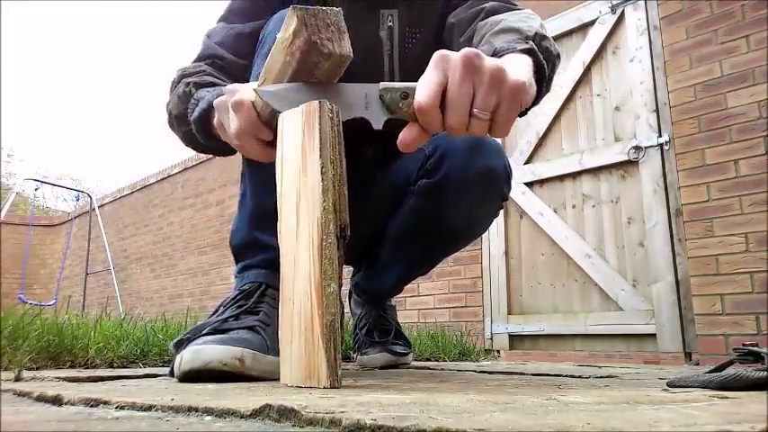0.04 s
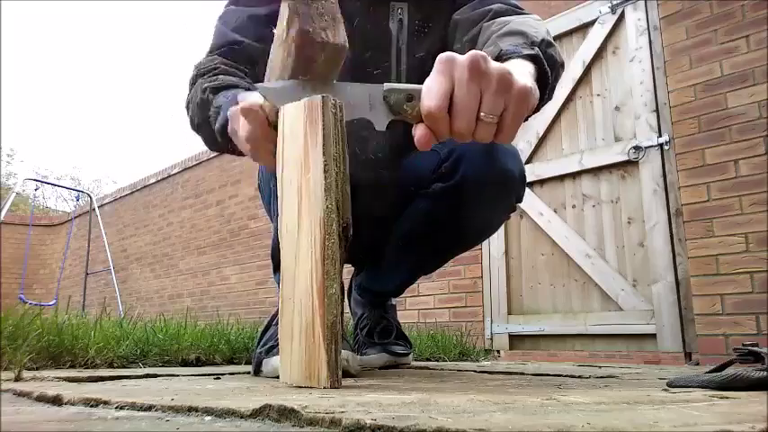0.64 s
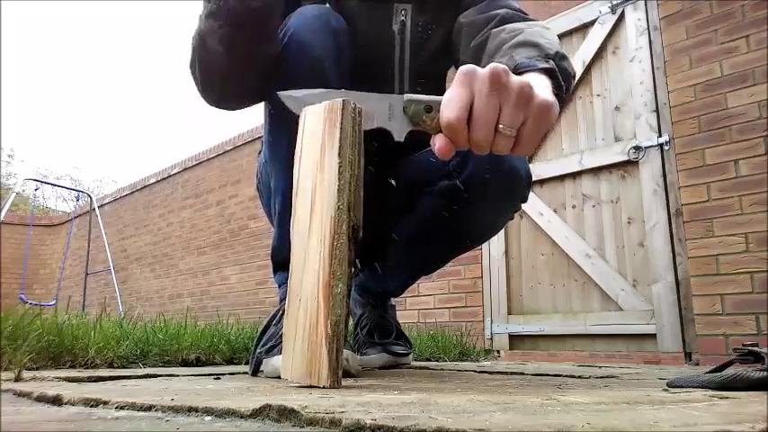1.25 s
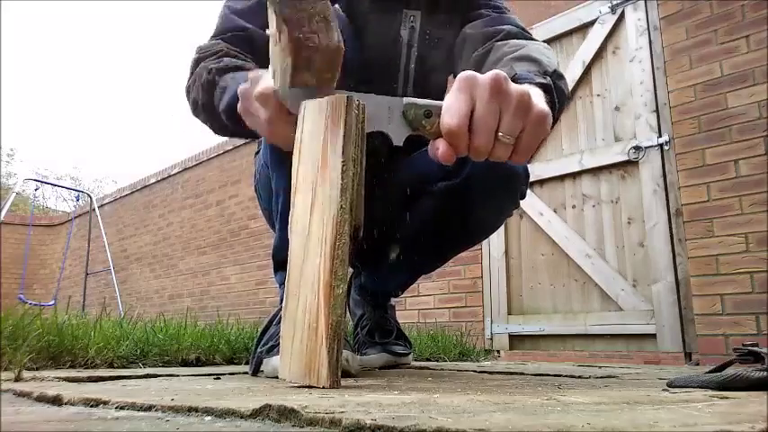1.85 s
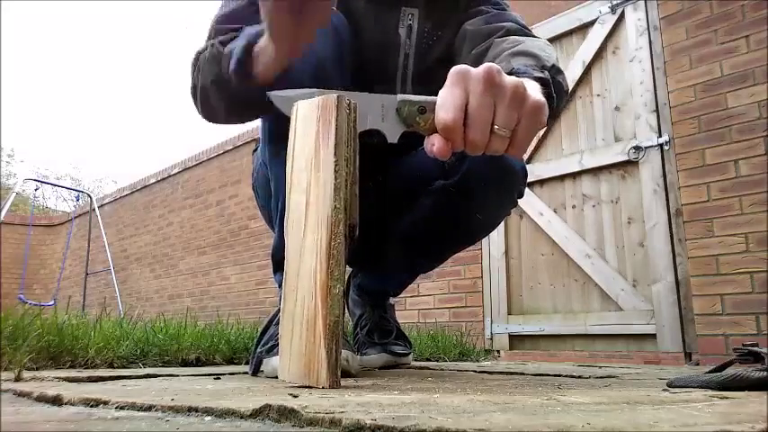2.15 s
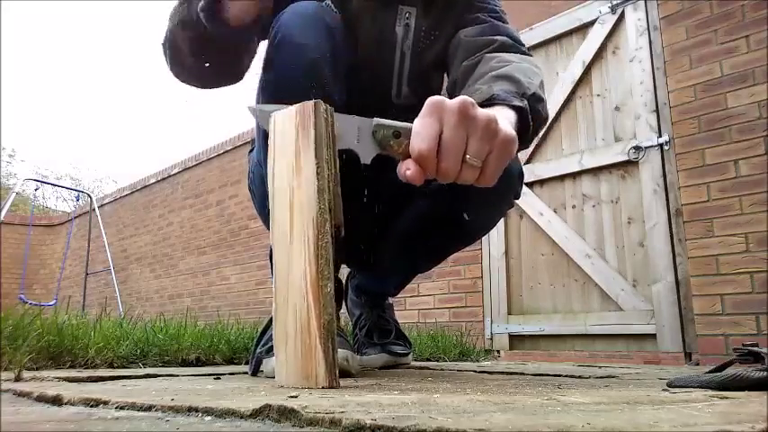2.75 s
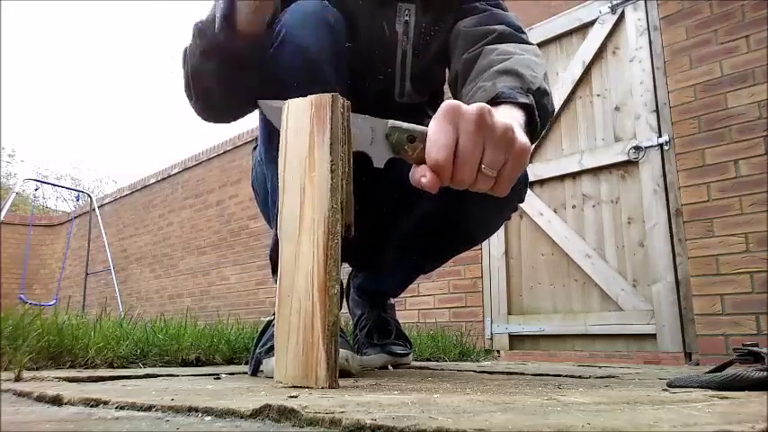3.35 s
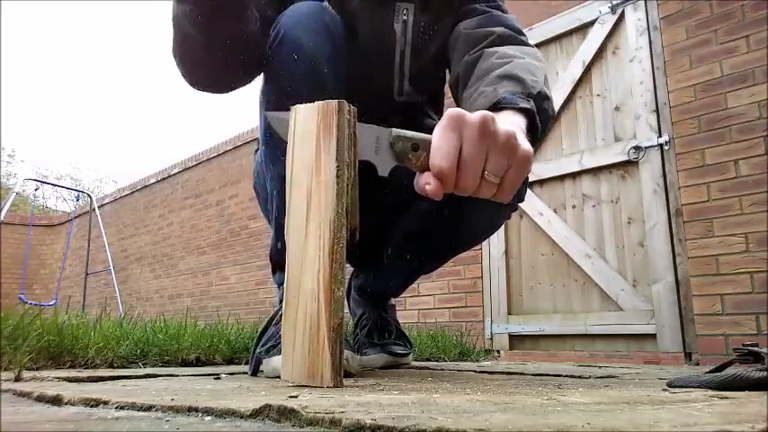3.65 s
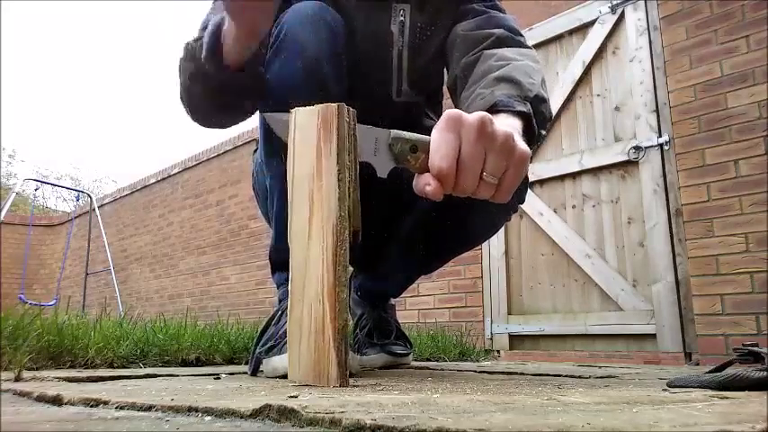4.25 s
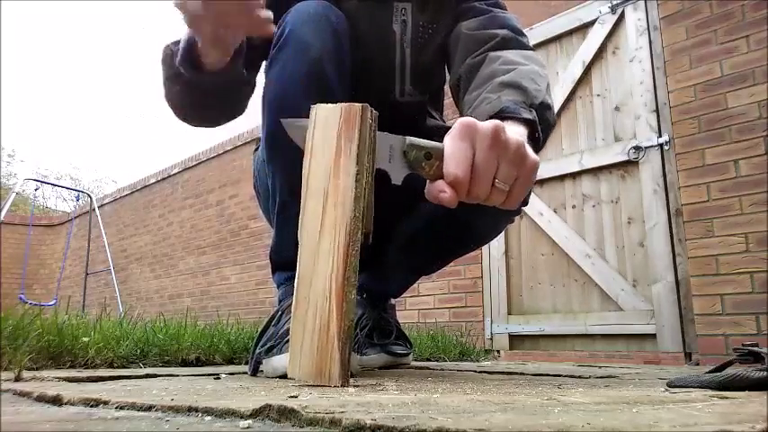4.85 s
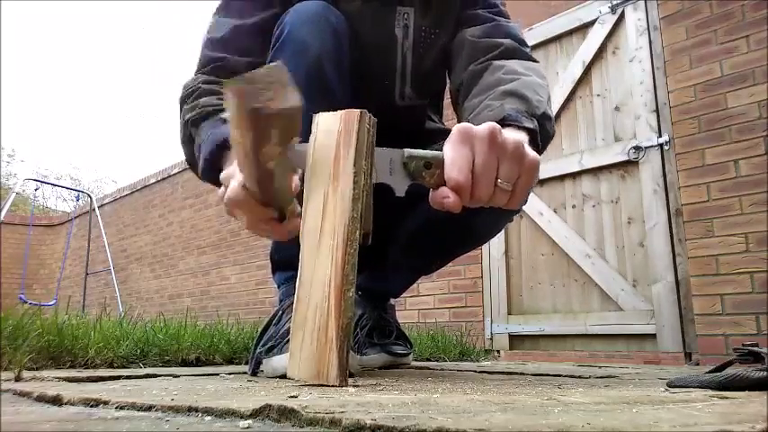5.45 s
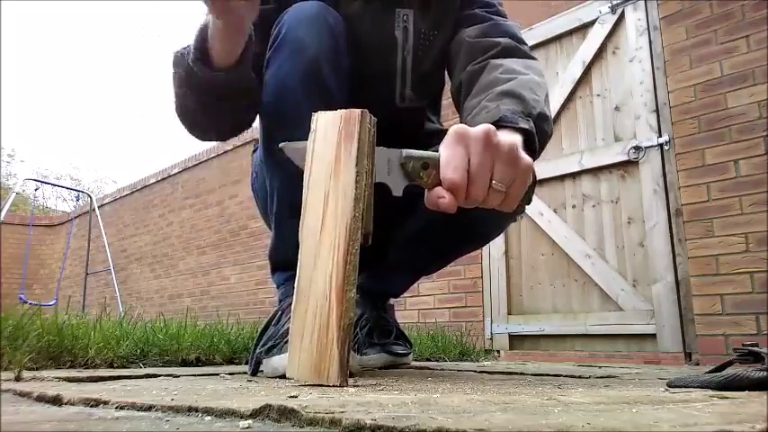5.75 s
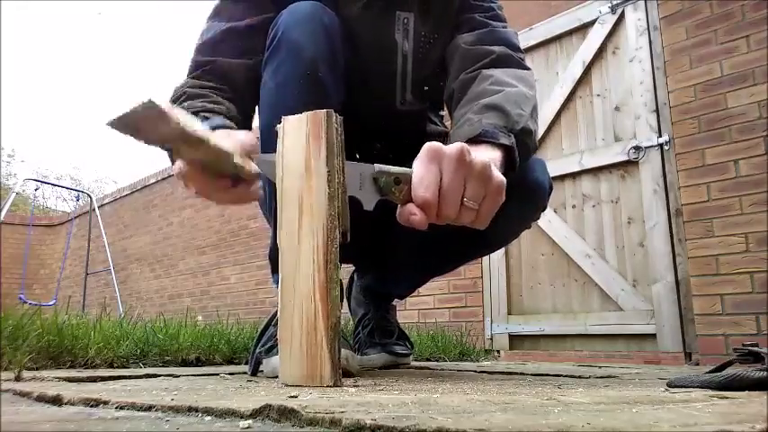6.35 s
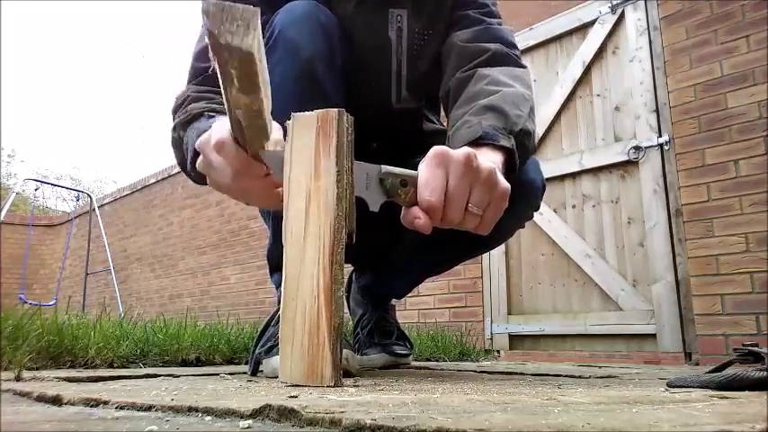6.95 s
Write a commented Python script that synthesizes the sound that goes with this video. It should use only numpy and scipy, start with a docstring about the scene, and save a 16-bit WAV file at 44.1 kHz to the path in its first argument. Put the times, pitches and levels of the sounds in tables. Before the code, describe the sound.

Faint ticks and a brief rustle of a jacket sleeve open the first half second. At about 0.8 seconds a wooden baton starts striking the spine of a knife set in a log, with sharp, loud knocks roughly every 0.4 seconds, about fifteen in all. Each blow combines a dry wooden knock, a very short steel clink, a crunch of tearing fibres and a low thud into the paving. At about 3.6 and 4 seconds the log splits with two brief buzzing cracks. After a slightly longer gap the knocks resume at 4.5 seconds, a little lighter, and continue until 6.4 seconds. A distant motor passes very faintly near 6.8 seconds, and one softer wooden knock comes at 7.2 seconds. The microphone is close and overloads slightly on the hits. The walled yard adds a short reverberation over a faint town hum.

```python
"""Faint ticks and a rustle of cloth, then sharp knocks: a baton drives a knife down through a log.
Each impact excites the damped modes of blade and log, thuds into the paving and tears fibres;
a sleeve swishes before it and splinters land after it. Midway the log splits and its halves buzz.
The walled yard reflects and reverberates over a faint town hum, and a far motor passes near the end.
The close microphone overloads on the knocks."""
import sys
import numpy as np
from scipy import signal
from scipy.fft import rfft, irfft, next_fast_len
from scipy.io import wavfile
from scipy.ndimage import uniform_filter1d

SR = 44100
rng = np.random.default_rng(int(sys.argv[2]) if len(sys.argv) > 2 else 0)


def file_out(sig):
    """Save sig as 16-bit WAV at sys.argv[1]."""
    # one column per channel
    cols = np.atleast_2d(sig).T
    # limit, then scale
    lim = np.clip(cols, -1, 1)
    pcm = np.round(lim * 32767).astype(np.int16)
    wavfile.write(sys.argv[1], SR, pcm)


N = 317079
T = np.arange(N) / SR

# baton impacts: t/s, then relative level/dB of force, blade ring, log knock, tearing, ground thud
BLOWS = [(0.7691, 0, -1.5, -8, -3, -8.5), (1.1459, 0, 1.5, 2.5, -6.5, -4), (1.5408, 2, 3, -3.5, 2.5, -8),
         (1.9514, -2, 5, -4.5, 5, -9), (2.3515, 1, 3, -3, 2, -6), (2.7507, -0.5, 5.5, -1.5, 1.5, 0),
         (3.173, -1.5, 3, 0.5, 0, -7), (3.5736, 4, -9, 2.5, -4.5, -2.5), (3.9713, 6, -2.5, -1.5, -6, -8),
         (4.4837, -1.5, -3.5, 2, -10.5, 2), (4.8558, -7.5, -3, 3.5, -1.5, -8),
         (5.2196, -9.5, -0.5, 9.5, -3.5, -8.5), (5.6032, -5.5, 0, -0.5, -0.5, 0),
         (5.9915, -3, 0.5, -2.5, 1.5, -6.5), (6.4038, -4, -7.5, -1, -2, -9),
         (6.4105, -11, -4, 9.5, -9, -6.5)]
# spectrum of tearing fibres, also of small contacts: f/Hz, relative level/dB
FIBRE_SPECTRUM = [(200, -5.5), (700, 3), (2000, -1), (4200, -4), (7000, -12.5), (11000, -14.5),
                  (16000, -25)]


def blows():
    """Modal superposition: returns the struck wood, and the blade ring and thud that stay near the ground."""
    # modes of log and baton besides the main knock: f/Hz, relative level/dB, T60/s
    wood_modes = [(186, -15.5, .075), (255, -16.5, 0.054), (301, -17, 0.034), (393.5, -13.5, 0.04),
                  (485.3, -13.5, .045), (829, -10, 0.03), (971, -7.5, 0.03), (1393, -5.5, 0.02),
                  (1789, -6.5, 0.026), (2840, -11, 0.025), (3600, -13.5, 0.0026)]
    log_hz, blade_hz, clink_hz, pinch_hz = 600, 1084.8, 3998, 600
    wood, near = np.zeros((2, 2, N))
    t = np.arange(SR // 4) / SR
    for s, force_db, blade_db, log_db, tear_db, thud_db in BLOWS:
        opening = openness(s)
        # no two blows land on quite the same spot
        log_shift, blade_shift, clink_shift = 1 + np.array([.04, .008, .02]) * rng.standard_normal(3)
        # the soft baton builds up its push in about a millisecond
        push = amp(force_db + 6.0) * (1 - np.exp(-t / 0.00099))
        body = 0
        for hz, db, t60 in wood_modes:
            shift, strength = rng.standard_normal(2)
            wander = .01 + .03 * min(hz / 2000, 1)
            boom_db = (3 - 3 * opening) * min(200 / hz, 1)  # the whole log booms more than the split one
            body += np.sign(shift) * ring(t, hz * (1 + wander * shift), db + boom_db + 2 * strength, t60)
        knock = ring(t, log_hz * log_shift, log_db + 2.5, t60=0.02)
        # a sharp tear is over sooner; deep in the split the fibres tear more brightly
        tear_t60 = 0.018 * np.exp(-.04 * tear_db)
        tear = fibres(t, FIBRE_SPECTRUM, tear_t60, tilt_db=2.1 * opening) * amp(tear_db + 6.5)
        # two bending modes of the steel, damped by the wood; the open split pinches the upper one higher
        upper_hz = (clink_hz + pinch_hz * opening ** 4) * clink_shift
        blade = ring(t, blade_hz * blade_shift, blade_db + 6, t60=0.019)
        blade += ring(t, upper_hz, blade_db - 5, t60=.029)
        # the slab's deepest thud reaches the left port most
        thud = ring(t, 130, thud_db - 4.5, t60=0.027)
        thud += ring(t, 75, thud_db - 17 + 7 * opening, t60=0.033) * amp([[5], [-6]])
        add(wood, s, push * (body + knock + tear))
        add(near, s, push * (blade - thud))
    return wood, near


def ring(t, hz, db, t60, port_lag_s=0.00015):
    """Damped oscillator: one mode, later at the right microphone port and of random strength at each."""
    t = t - np.array([[0], [port_lag_s]])
    port_db = 1.5 * rng.standard_normal((2, 1))
    return -amp(db + port_db) * np.sin(2 * np.pi * hz * t) * fade(t, t60)


def fibres(t, spectrum, t60, tilt_db=0):
    """Acoustic emission: wood fibres snap in uneven bursts once the wedge bites."""
    knots = t[::32]
    snaps = amp(3 * np.interp(t, knots, rng.standard_normal(len(knots))))
    onset = np.clip(t / 0.0019, 0, 1)
    return coloured_noise(len(t), spectrum, tilt_db) * snaps * fade(t, t60) * onset


def openness(s, middle_s=3.5, spread_s=.6):
    """Logistic growth of the split: how far the log is open at time s, from 0 to 1."""
    return 1 / (1 + np.exp((middle_s - s) / spread_s))


def splits():
    """Crack propagation: the split runs down the log and its loosened halves buzz in a band of noise."""
    # advances of the crack: t/s, level/dB, centre f/Hz, T60/s
    cracks = [(3.574, -0.5, 502, 0.079), (3.973, 0, 483, .11), (3.975, -9.5, 1650, 0.17)]
    out, t = np.zeros((2, N)), np.arange(SR // 4) / SR
    for s, db, hz, t60 in cracks:
        band = [(0.94 * hz, -22), (0.73 * hz, -3), (1.25 * hz, 0), (2.7 * hz, -18), (6 * hz, -44)]
        add(out, s, amp(db) * fibres(t, band, t60))
    return out


def ticks():
    """Light impacts: a scratch and one damped mode; a soft, low contact builds up more slowly."""
    # contacts of blade, grip and baton: t/s, level/dB, f/Hz, T60/s, tilt/(dB per octave)
    contacts = [(0.037, -29.5, 503, 0.012, -1), (.131, -40.5, 596, 0.022, -2.5),
                (.333, -35.5, 1144, 0.033, 4), (3.034, -25, 1495, 0.0098, -1), (4.064, -37, 4900, .008, 4),
                (4.229, -49, 9240, 0.023, 9), (6.626, -33, 1107, 0.021, 3.5),
                (7.181, -12, 468.3, 0.024, -7.5)]
    out, t = np.zeros((2, N)), np.arange(SR // 8) / SR
    for s, db, hz, t60, tilt_db in contacts:
        scratch = coloured_noise(len(t), FIBRE_SPECTRUM, tilt_db) * fade(t, t60)
        onset = 1 - np.exp(-3 * hz * t)
        add(out, s, amp(db) * (scratch + ring(t, hz, db=2.6, t60=t60)) * onset)
    return out


def grip(count=4):
    """Contact transients: the grip clicks faintly as the knife is set and as the wedged blade is eased."""
    # shifts of the grip: start t/s, duration/s, lowest click level/dB
    shifts = [(0.085, 0.23, -55.5), (6.103, 0.93, -52.5)]
    out, t = np.zeros((2, N)), np.arange(SR // 16) / SR
    for s, duration, db in shifts:
        for when, size in rng.random((count, 2)):
            click = coloured_noise(len(t), FIBRE_SPECTRUM, tilt_db=6.5) * fade(t, t60=0.043)
            add(out, s + duration * when, click * amp(db + 7.5 * size))
    return out


def splinters(count=3):
    """Brief impacts have broad spectra: splinters tick on the paving after each blow."""
    out, t = np.zeros((2, N)), np.arange(SR // 16) / SR
    for s, *_ in BLOWS:
        for when, size in rng.random((count, 2)):
            tick = coloured_noise(len(t), FIBRE_SPECTRUM, tilt_db=4.5) * fade(t, t60=0.014)
            add(out, s + 0.05 + 0.085 * when, tick * amp(-57 + 10.8 * size))
    return out


def sleeve():
    """Friction noise: the jacket rubs once as the arm lifts, then swishes on each downswing."""
    # spectra of rubbing cloth and of a sleeve sweeping past the body: f/Hz, relative level/dB
    rub_spectrum = [(200, -7), (600, 1), (1300, -6), (2500, -3.5), (5000, -10), (8000, -16.5),
                    (11000, -9.5), (16000, -23)]
    swish_spectrum = [(400, -15), (900, -0.5), (1600, 0.5), (2600, -6.5), (5000, -18), (8000, -22),
                      (10500, -17.5), (16000, -24.5)]
    peak_s, rise_db_per_s, fall_db_per_s = 0.418, 176, 602
    lift_db = -32 + np.minimum(rise_db_per_s * (T - peak_s), fall_db_per_s * (peak_s - T))
    rub = coloured_noise(N, rub_spectrum) * amp(lift_db)
    # shorter swings swish more quietly as the log opens
    lead_s, width_s = 0.056, .04
    swings = [amp(-45 - 11.5 * openness(s)) * np.exp(-((T - s + lead_s) / width_s) ** 2)
              for s, *_ in BLOWS]
    swish = coloured_noise(N, swish_spectrum) * np.max(swings, axis=0)
    return (rub + swish) * amp(0.98 * drift(140))


def echoes(x):
    """Scattering: rough surfaces smear each early reflection into a short burst."""
    # reflections from slab, body, gate and wall: delay t/s, level/dB, smear T60/s
    reflections = [(.003, -22, 0.021), (0.0097, -17, 0.039), (.023, -26.5, 0.062)]
    t = np.arange(SR // 10) / SR
    response = sum(amp(db) * unit(noise(len(t)) * fade(t - delay, t60)) for delay, db, t60 in reflections)
    return signal.fftconvolve(x, response / np.sqrt(len(t)), axes=1)[:, :N]


def reverberation(x, build_s=0.004):
    """Energy balance of a diffuse field: between the yard's walls each band stores power and leaks it."""
    # reverberant bands of the yard: f/Hz, relative level/dB, T60/s
    bands = [(60, -19.5, .4), (148, -3, 1), (261, 7.5, 0.59), (420, 9.5, 0.27), (726, 4, 0.42),
             (1140, -7.5, 0.7), (2100, -2.5, 0.35), (4420, -3, 0.38), (7400, 2, 0.28), (15000, -9.5, 0.15)]
    hz, db, t60 = np.transpose(bands)
    size = next_fast_len(N // 2 + 1) * 2
    log_hz = np.log(np.maximum(np.fft.rfftfreq(size, 1 / SR), 1))
    source, air = rfft(x, size), rfft(noise(size))
    build = np.exp(-1 / (build_s * SR))
    out = 0
    for share, band_db, band_t60 in zip(np.eye(len(hz)), db, t60):
        band = np.sqrt(np.interp(log_hz, np.log(hz), share))
        power = np.mean(irfft(source * band)[:, :N] ** 2, axis=0)
        retained = np.exp(-2 * np.log(1000) / (band_t60 * SR))
        stored = signal.lfilter([1], [1, -retained], power)
        diffused = signal.lfilter([1 - build], [1, -build], stored)
        out += amp(band_db - 55.0) * np.sqrt(diffused) * unit(irfft(air * band)[:, :N])
    return out


def town(nearest_s=6.75, passing_s=0.25):
    """Spherical spreading: over the town's hum, a far motor and its road noise swell as 1/distance."""
    # spectrum of distant traffic and partials of the motor: f/Hz, relative level/dB
    traffic_spectrum = [(15, -47), (25, -17), (92, -3.5), (249, -3), (416, -12.5), (503, -5.5), (911, -17),
                        (1020, -15.5), (1100, -21), (1740, -23.5), (1890, -26), (3080, -27.5),
                        (4250, -35.5), (10100, -43.5), (16000, -46.5)]
    partials = [(113.0, -61.5), (226.1, -55), (489.9, -58), (985.1, -73)]
    town_db, road_db, motor_db = -50.5, -47.5, 2.5
    nearness = 1 / np.hypot(1, (T - nearest_s) / passing_s)
    traffic_gain = np.hypot(amp(town_db), amp(road_db) * nearness)  # incoherent sources add in power
    traffic = coloured_noise(N, traffic_spectrum) * traffic_gain * amp(0.88 * drift(7))
    speed = 1 + 0.0047 * drift(2.5)
    phase_per_hz = 2 * np.pi * np.cumsum(speed) / SR
    motor = sum(amp(db + 3.1 * drift(7.2)) * np.sqrt(2) * np.sin(hz * phase_per_hz) for hz, db in partials)
    return traffic + motor * amp(motor_db) * nearness


def noise(size):
    """Coherence of a diffuse field: both ports receive nearly the same bass but unrelated treble."""
    mid, side = rng.standard_normal((2, size))
    side = colour(side, [(50, -12.5), (200, -15.5), (400, -6.5), (750, -1)])
    return unit(np.array([mid + side, mid - side]))


def coloured_noise(size, spectrum, tilt_db=0):
    """Source and filter: diffuse noise shaped to a spectrum, at rms 1."""
    return unit(colour(noise(size), spectrum, tilt_db))


def colour(x, spectrum, tilt_db=0):
    """Minimum-phase filter through (f/Hz, level/dB) points, tilted by tilt_db per octave."""
    size = next_fast_len(x.shape[-1] // 2 + 1) * 2
    f = np.maximum(np.fft.rfftfreq(size, 1 / SR), 1)
    hz, db = np.transpose(spectrum)
    db = np.interp(np.log(f), np.log(hz), db) + tilt_db * np.log2(np.maximum(f / hz[0], 1))
    bass_cut = np.minimum(f / hz[0], 1) ** 2
    cepstrum = irfft(np.log(amp(db) * bass_cut))
    # folding the cepstrum makes the filter causal
    cepstrum[1:size // 2] *= 2
    cepstrum[size // 2 + 1:] = 0
    return irfft(rfft(x, size) * np.exp(rfft(cepstrum)))[..., :x.shape[-1]]


def drift(rate_hz):
    """Smooth random fluctuation with a spread near 1."""
    hold = int(SR / rate_hz)
    steps = np.repeat(rng.standard_normal(N // hold + 1), hold)
    return uniform_filter1d(steps, hold)[:N]


def fade(t, t60):
    """Exponential decay from t = 0, by 60 dB in t60 seconds."""
    return (t >= 0) * np.exp(-np.log(1000) * np.maximum(t, 0) / t60)


def amp(db):
    """Level to amplitude ratio."""
    return 10 ** (np.asarray(db) / 20)


def unit(x):
    """Normalisation to rms 1."""
    return x / np.sqrt(np.mean(x ** 2))


def add(out, s, x):
    """Superposition of x on out from time s."""
    i = int(max(s, 0) * SR)
    out[:, i:i + x.shape[1]] += x[:, :max(N - i, 0)]


def scene():
    """Superposition of direct sound, early reflections, reverberation and the town."""
    wood, near = blows()
    direct = wood + splits() + ticks() + grip() + splinters() + sleeve()
    radiated = direct + amp(-10.5) * near  # blade and slab excite the yard only weakly
    return direct + near + echoes(radiated) + reverberation(radiated) + town()


def record(dry, top_hz=16000):
    """Overload distortion: the microphone ports colour the sound, the input clips, and the top is cut."""
    # frequency response of the ports: f/Hz, level/dB
    port_response = [(38, -10), (80, -2), (2500, 0.5), (4000, 1), (5800, 0.5), (8000, -1), (9800, 4.5),
                     (12000, -2), (16000, 3)]
    clipped = np.clip(colour(dry, port_response), -1, 1)
    low_pass = signal.ellip(10, .1, 70, top_hz, fs=SR, output="sos")
    return np.clip(signal.sosfiltfilt(low_pass, clipped), -1, 1)


dry = scene()
out = record(dry)
file_out(out)
```